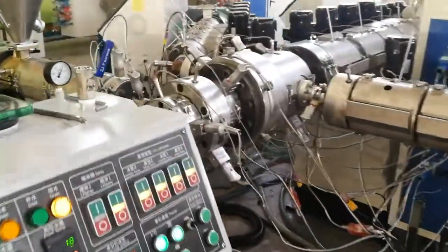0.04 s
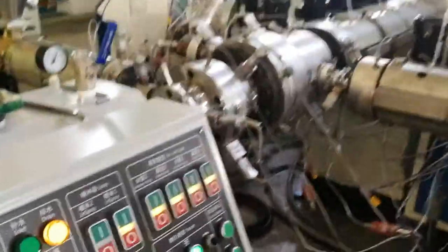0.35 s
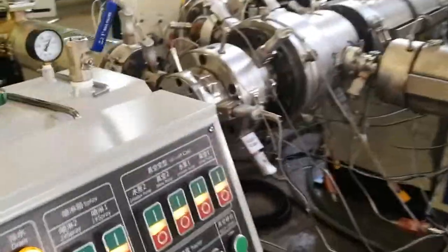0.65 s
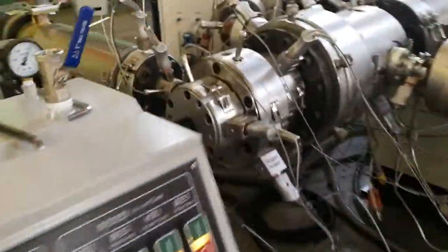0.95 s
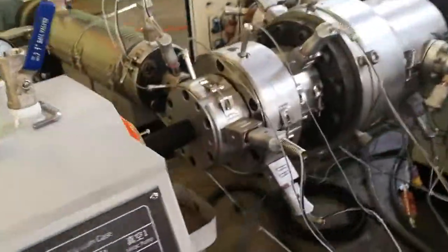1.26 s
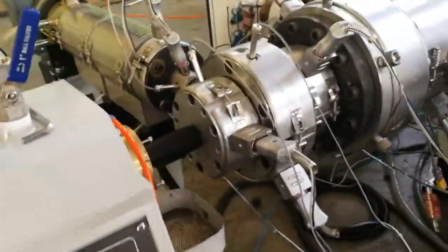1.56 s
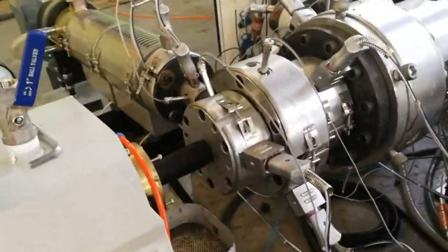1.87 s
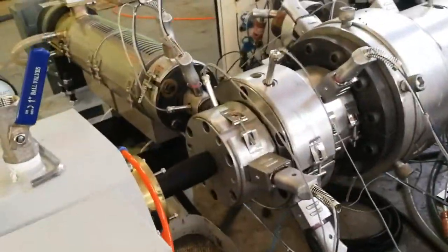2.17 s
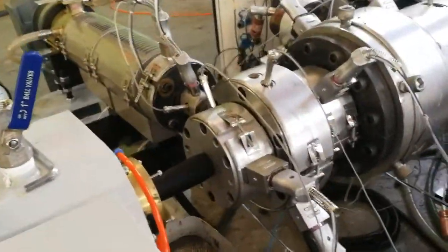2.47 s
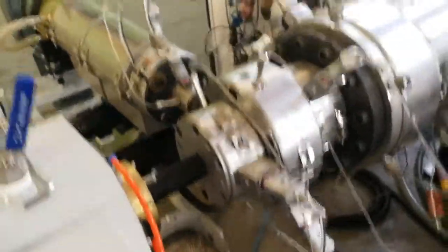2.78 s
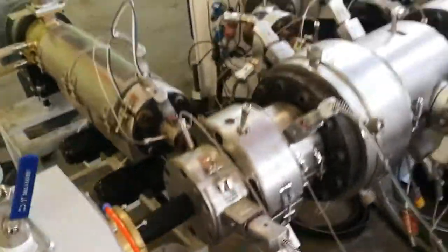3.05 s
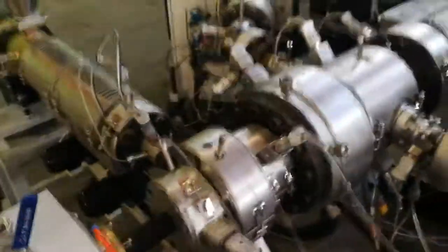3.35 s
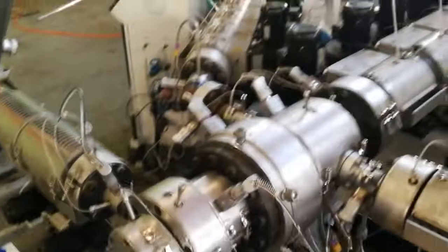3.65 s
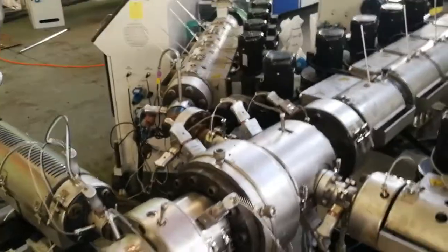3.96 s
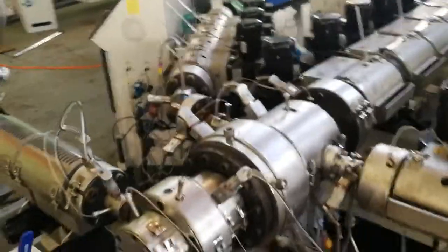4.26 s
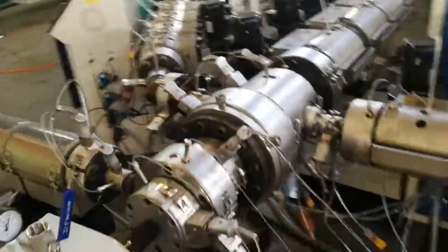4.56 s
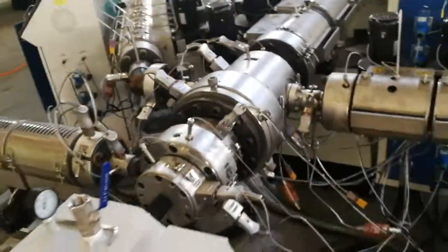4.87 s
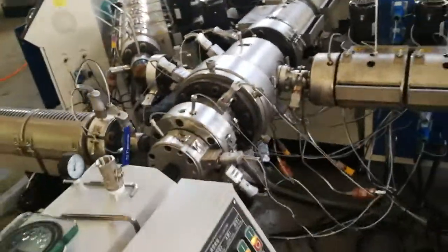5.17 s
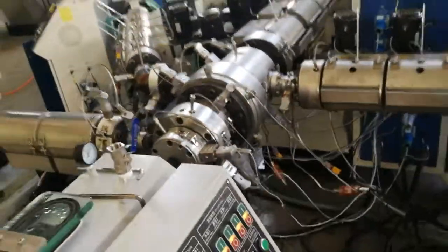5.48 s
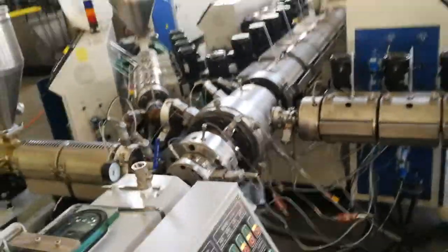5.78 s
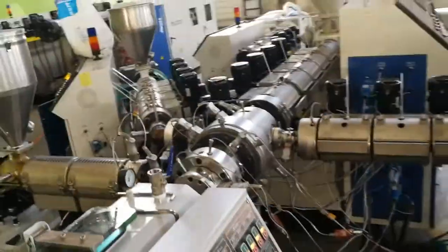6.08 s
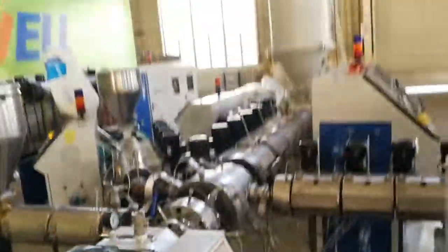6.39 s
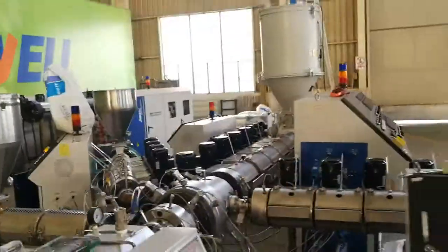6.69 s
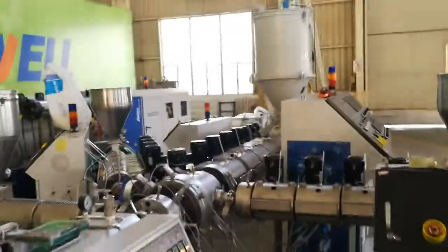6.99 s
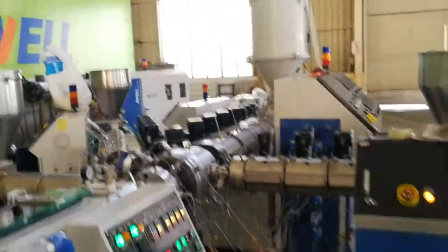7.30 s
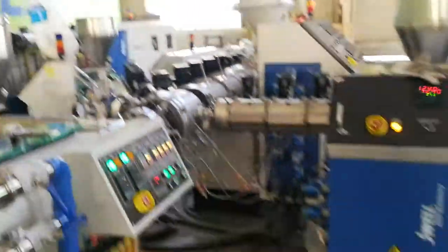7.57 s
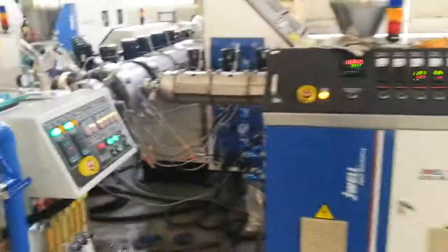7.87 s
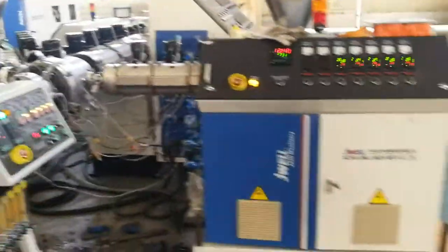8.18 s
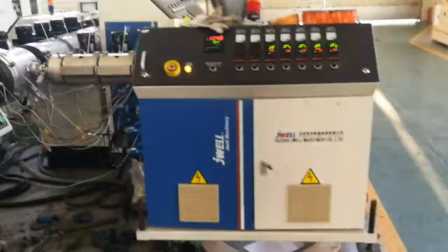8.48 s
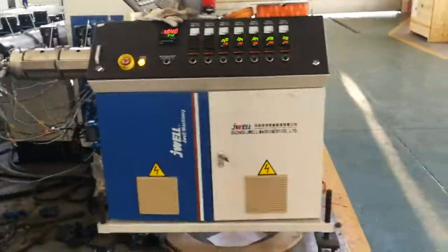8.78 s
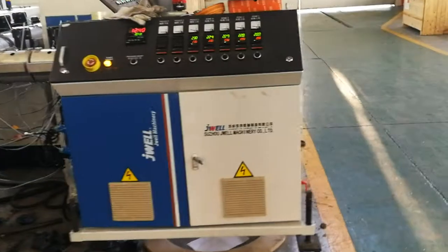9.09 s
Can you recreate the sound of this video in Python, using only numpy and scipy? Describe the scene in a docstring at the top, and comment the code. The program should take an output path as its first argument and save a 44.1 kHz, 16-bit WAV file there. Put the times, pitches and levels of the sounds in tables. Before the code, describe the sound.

From the start, a loud, bright hiss of air being sucked through a wet gap into a vacuum tank dominates, mostly stronger on the left, with a hollow, slightly whistling colour. Beneath it are the steady, diffuse roar of a large factory hall, a low motor hum and a faint gear whine. Two blowers at nearly the same middle pitch whine and beat quickly against each other, swelling and shifting between sides as the microphone moves along the extrusion line. The whine rises briefly just before 1 second. The hiss gives tiny sputters at about 2.2 seconds and more faintly near 4.7 seconds, and stays strong until around 6.5 seconds. The blower whine swells from about 6 seconds and peaks near 7. From 7 to 8 seconds the hiss recedes and the low rumble grows. The machinery keeps running, with a softer hiss, until the end at about 9 seconds.

```python
"""Pipe extrusion line in a factory hall

Air sucked through the wet gap round a plastic pipe at a vacuum tank's mouth makes a loud, sputtering
hiss: turbulent jet noise, coloured by the gap's resonances. Two blowers of almost equal pitch whine and
beat; motors and gearboxes hum in the hall's diffuse roar. The listener moves along the line."""
import sys
import numpy as np
from scipy import signal
from scipy.fft import rfft, irfft
from scipy.io import wavfile
from scipy.ndimage import uniform_filter1d

SR = 44100
rng = np.random.default_rng(int(sys.argv[2]) if len(sys.argv) > 2 else 0)


def output_pcm(signal):
    """Save a mono or channel-first signal as 16-bit PCM at the path in sys.argv[1].

    Samples are clipped to [-1, 1] before scaling.
    """
    pcm = np.clip(np.atleast_2d(signal).T, -1, 1) * 32767
    wavfile.write(sys.argv[1], SR, np.round(pcm).astype(np.int16))


N = 407484
TIME = np.arange(N) / SR
BAND_EDGE_HZ = 15850


def from_db(db):
    """Amplitude ratio of a level in decibels."""
    return 10 ** (np.asarray(db) / 20)


def unit_rms(x):
    """Normalisation to rms 1."""
    return x / np.sqrt(np.mean(x ** 2) + 1e-20)


def over_time(rows, t):
    """Linear interpolation of a table's columns at the times t."""
    time_s, *columns = np.transpose(rows)
    return [np.interp(t, time_s, column) for column in columns]


def over_frequency(rows, hz):
    """Interpolation of a table's columns on a logarithmic frequency axis."""
    row_hz, *columns = np.transpose(rows)
    return [np.interp(np.log(hz + 1), np.log(row_hz + 1), column) for column in columns]


def drift(t, rate_hz):
    """Low-pass noise: a random fluctuation of rms 1 that rolls off above rate_hz."""
    size, steps_per_s = 16384, 1000
    hz = np.fft.rfftfreq(size, 1 / steps_per_s)
    wander = irfft(rfft(rng.standard_normal(size)) / (1 + (hz / rate_hz) ** 4) ** .5)
    return np.interp(t, np.arange(size) / steps_per_s, unit_rms(wander))


def noise_pair(correlation, size):
    """Partial coherence: frequencies, times and short-time spectra of two correlated white noises."""
    white = rng.standard_normal((2, N))
    hz, t, (left, other) = signal.stft(white, SR, nperseg=size, noverlap=size - size // 4)
    hz = hz[:, None]
    shared = np.clip(over_frequency(correlation, hz)[0], -1, 1)
    return hz, t, left, shared * left + np.sqrt(1 - shared ** 2) * other


def to_sound(spectra, size):
    """Overlap-add synthesis from short-time spectra."""
    return signal.istft(np.array(spectra), nperseg=size, noverlap=size - size // 4)[1][:, :N]


def at_level(power, db):
    """Power response scaled so that unit white noise leaves it at the level db."""
    return power / power.mean(0) * from_db(db) ** 2


# Spectral density of the hall's roar: frequency_hz, relative_db
ROAR_SPECTRUM = [(15, -21), (35, -6), (65, -11), (110, -7.5), (160, -2), (210, -2), (350, -0.5), (470, -8),
                 (650, -2.5), (900, -1.5), (1500, 0), (2500, -5), (5000, -1.5), (16000, -17)]
# Hall sound along the path, each level taken about its mean: time_s, rumble_db, motor_db, fan_db
HALL_SWELL = [(0, -54, -41, -44), (1.1, -57, -42.5, -44.5), (1.6, -54, -41, -40.5),
              (3.45, -62.5, -43.5, -46.5), (4.1, -58, -41, -46), (5.1, -58.5, -44, -47.5),
              (7.2, -54.5, -38.5, -42), (8.5, -49.5, -40, -43.5), (9.24, -50, -40, -42)]
# Left-right coherence of the reverberant field: frequency_hz, correlation
HALL_COHERENCE = [(35, .999), (85, .99), (170, .97), (330, .74), (500, .3), (900, 0), (1500, -.1),
                  (3000, 0)]


def hall_roar(level_db=-32.0):
    """Diffuse field: reverberation blends fans and machines; long waves reach both sides alike."""
    hz, t, left, right = noise_pair(HALL_COHERENCE, size=2048)
    # frequency_hz, rumble_share, motor_share, fan_share
    bands = [(100, 1, 0, 0), (220, 0, 1, 0), (450, 0, 1, 0),
             (900, 0, 0, 1), (1700, 0, 0, 1), (5000, 0, 0, 0)]
    shares = over_frequency(bands, hz)
    swell_db = sum(share * (db - db.mean()) for share, db in zip(shares, over_time(HALL_SWELL, t)))
    power = at_level(from_db(over_frequency(ROAR_SPECTRUM, hz)[0]) ** 2, level_db)
    colour = np.sqrt(power) * from_db(swell_db)
    return to_sound([left * colour, right * colour], size=2048)


def hall_tone(cycles, hz, fade_hz=1.36, steady=0.85, waver=0.46):
    """Multipath interference: a tone of rms 1 shifts in strength and phase as the listener moves."""
    step = 32
    t = TIME[::step]
    left, other = [steady * np.exp(2j * np.pi * rng.random())
                   + (drift(t, fade_hz) + 1j * drift(t, fade_hz)) / 2 for _ in "LR"]
    shared = np.clip(over_frequency(HALL_COHERENCE, hz)[0], -1, 1)
    paths = np.array([left, shared * left + np.sqrt(1 - shared ** 2) * other])
    paths *= 1 + waver * drift(t, 8.0)  # an uneven load shakes the tone
    paths /= np.sqrt(np.mean(abs(paths) ** 2, axis=1, keepdims=True) / 2)
    return (np.repeat(paths, step, axis=1)[:, :N] * np.exp(2j * np.pi * cycles)).real


# Tones of motors, pumps and gears, before the swell along the path: pitch_hz, level_db
HUM_TONES = [(36.3, -70), (99.6, -61), (185.7, -59), (193.8, -55), (203.2, -59), (240, -55), (242.7, -52),
             (286.7, -58), (292, -56), (300.1, -56), (352.6, -54), (363.4, -54), (371.4, -57), (418.6, -62),
             (438.7, -52.5), (442.8, -58), (773.8, -54), (877.5, -57), (885.6, -57), (1191.1, -52),
             (1200.5, -51), (1242.2, -59)]


def motor_hum():
    """Line spectrum of rotating machines, louder as the listener nears the drives."""
    motor_db = over_time(HALL_SWELL, TIME)[1]
    hum = sum(from_db(db) * hall_tone(hz * TIME, hz) for hz, db in HUM_TONES)
    return hum * from_db(motor_db - motor_db.mean())


# Gear whine along the path: time_s, level_db
GEAR_LEVEL = [(0, -49), (1.2, -51), (2.9, -44.5), (3.3, -49), (4.3, -44.5), (4.6, -57), (6.1, -56),
              (7.7, -43), (8.4, -54), (9.24, -43)]


def gear_whine(mesh_hz=1075.3, left_lead_cycles=0.044, waver=0.28):
    """Gear-mesh tone: direct sound from the gearbox, modulated in phase and amplitude by the load."""
    cycles = mesh_hz * TIME + np.array([[left_lead_cycles], [0]]) + 0.11 * drift(TIME, 2.2)
    tone = np.sqrt(2) * from_db(over_time(GEAR_LEVEL, TIME)[0]) * np.sin(2 * np.pi * cycles)
    return tone * (1 + waver * drift(TIME, 8.8))


def blade_passes(pitch_hz, wander_hz):
    """Phase as the integral of frequency: the count of blades passed at a slightly wandering speed."""
    return np.cumsum(pitch_hz + wander_hz * drift(TIME, 1.1)) / SR


def blade_whine(passes, levels, leads, roughness, eddy_hz=28):
    """Blade-pass tone, randomly modulated by turbulence at the intake."""
    lead_cycles = over_time(leads, TIME)[0]
    tone = np.exp(2j * np.pi * (passes + np.array([lead_cycles, -lead_cycles]) / 2))
    eddies = np.array([drift(TIME, eddy_hz) + 1j * drift(TIME, eddy_hz) for _ in "LR"])
    return np.sqrt(2) * from_db(over_time(levels, TIME)) * (tone * (1 + roughness * eddies)).real


# Each whine along the path through the hall's standing waves: time_s, left_db, right_db
NEAR_WHINE_LEVEL = [(0.0, -35.5, -41.5), (0.71, -24.5, -25), (0.87, -22, -42), (1.23, -39.5, -30.5),
                    (2.39, -36.5, -30), (2.85, -29, -42), (3.16, -51, -34.5), (4.12, -36, -29.0),
                    (4.48, -55, -38), (4.74, -30.5, -49), (5.0, -31.5, -29), (5.76, -23, -44),
                    (5.97, -30, -27.5), (6.58, -24, -38.0), (7.09, -20, -28.5), (8.15, -35, -42),
                    (8.56, -24.5, -42), (9.24, -48, -35.0)]
FAR_WHINE_LEVEL = [(0.0, -36.0, -33), (4.31, -40, -55), (4.97, -45.5, -57), (6.78, -28.5, -31.5),
                   (8.19, -36, -36), (9.24, -31, -52)]
# Phase lead of each whine on the left: time_s, lead_cycles
NEAR_PHASE_LEAD = [(0, .55), (.7, .1), (1, .5), (1.7, .35), (2.4, .85), (3.7, 1.15), (4.8, .9), (5.9, 1.75),
                   (7.7, 1.45), (8.2, 1.85), (8.7, 1.65), (9.24, 2.6)]
FAR_PHASE_LEAD = [(0, .45), (3.5, .05), (5, -.55), (5.8, -.5), (6.4, .35), (7.8, .6), (9.24, .15)]
# Shaft harmonics from the near blower's uneven blades: shaft_order, relative_db
SHAFT_HARMONICS = [(7, -53), (10, -60), (11, -61), (12, -63), (13, -58), (14, -55), (16, -53), (20, -62),
                   (30, -54)]


def blowers(near_hz=716.8, far_hz=725.2, blade_count=15, harmonics_db=0.5):
    """Beating: two blade-pass tones interfere at their difference frequency, about 8 Hz."""
    near = blade_passes(near_hz, wander_hz=0.3)
    far = blade_passes(far_hz, wander_hz=0.53)
    sound = blade_whine(near, NEAR_WHINE_LEVEL, NEAR_PHASE_LEAD, roughness=0.11)
    sound += blade_whine(far, FAR_WHINE_LEVEL, FAR_PHASE_LEAD, roughness=0.21)
    for order, db in SHAFT_HARMONICS:
        ratio = order / blade_count
        sound += from_db(db + harmonics_db) * hall_tone(ratio * near, ratio * near_hz)
    return sound


def steel_comb(hz, t, reflection=0.12, count=8):
    """Comb filtering: echoes off the steel round the gap ripple the gain as the listener moves."""
    gain = 1
    for delay_s in rng.uniform(.0008, .0035, count):
        moving_delay_s = delay_s * (1 + 0.043 * drift(t, 0.44))
        gain += reflection * np.cos(2 * np.pi * (hz * moving_delay_s + rng.random()))
    return gain


def machine_echoes(x, wet_db=-8, t60_s=0.083, size=32768):
    """Early reflections off the machines add a fine grain that changes with the listener's position."""
    t = np.arange(4096) / SR
    hop = size // 2
    wet = np.zeros((2, N + 2 * size))
    padded = np.pad(x, ((0, 0), (hop, size)))
    for start in range(0, N + hop, hop):
        tail = rng.standard_normal(len(t)) * from_db(-60 * t / t60_s)
        part = padded[:, start:start + size]
        part = part * signal.windows.cosine(size)[:part.shape[1]]
        echo = signal.fftconvolve(part, tail[None] / np.linalg.norm(tail), axes=1)
        wet[:, start:start + echo.shape[1]] += echo
    return (x + from_db(wet_db) * wet[:, hop:hop + N]) / np.hypot(1, from_db(wet_db))


# Spectral density of the jet: frequency_hz, left_relative_db, right_relative_db
JET_SPECTRUM = [(800.0, -53, -8), (1800.0, -26, -26), (4220, 0, 3.5), (5370, -3.5, -21), (6270, -6, 0),
                (9090, -4, -1.5), (8950, 3, 10), (10950, -1.5, -5.5), (11430, 6, 9), (13050, -2, -6.5),
                (13400, 5, -1), (15200, -0.3, 6.5), (15600, 7, 4)]
# The jet as the tank's mouth nears and recedes, before the treble gain: time_s, left_db, right_db
JET_PATH_LEVEL = [(0.0, -19, -23), (0.16, -17.5, -23), (0.87, -20, -26.0), (1.83, -15.5, -27.5),
                  (2.69, -17.5, -28), (3.3, -16.5, -23.5), (4.61, -15, -19.5), (5.32, -17.5, -19),
                  (5.48, -16.5, -21), (6.99, -22.5, -30), (8.1, -30, -34.5), (9.24, -28, -34)]
# The jet's top octave against the rest: time_s, gain_db
JET_TREBLE = [(0.0, -6), (1.06, -2.5), (2.57, -2), (3.18, 2.5), (5.49, -6.5), (6.65, -5), (7.26, -4),
              (7.72, -2.5), (9.24, -6)]


def jet_power(side, hz, t):
    """Turbulent jet noise: a broad power spectrum with beamed treble, on one side (0 left, 1 right)."""
    spectrum = from_db(over_frequency(JET_SPECTRUM, hz)[side]) ** 2 * (hz < BAND_EDGE_HZ)
    beamed_share = over_frequency([(9000, 0), (14000, 1)], hz)[0]
    treble_gain = from_db(beamed_share * over_time(JET_TREBLE, t)[0])
    return at_level(spectrum, over_time(JET_PATH_LEVEL, t)[side]) * treble_gain ** 2


def resonance(hz, centre_hz, width_hz, level_db):
    """Power response of a steep-sided resonance, width_hz wide at 6 dB below its peak."""
    return at_level(1 / (1 + (2 * (hz - centre_hz) / width_hz) ** 2) ** 2, level_db)


# The gap's three resonances are beamed, so each side has its own level: time_s, left_db, right_db
GAP_HOLLOW_LEVEL = [(0.0, -24, -31), (0.81, -21.5, -29), (1.37, -22.0, -25), (2.73, -25, -27),
                    (4.44, -24, -25.5), (5.25, -23.0, -46), (6.51, -25, -27.5), (7.12, -25.5, -31.5),
                    (9.24, -30, -37)]
GAP_RING_LEVEL = [(0.0, -31, -41), (0.91, -38.0, -37), (1.17, -26.0, -40.0), (2.58, -17.5, -34),
                  (2.94, -24, -28.5), (4.85, -29.5, -37.5), (5.06, -33, -25), (5.92, -29, -25.5),
                  (6.63, -32, -26), (7.99, -27.5, -36.5), (9.24, -30.5, -34)]
GAP_WHISTLE_LEVEL = [(0.0, -20.5, -24.5), (0.91, -16, -28), (1.22, -23.0, -25.5), (1.88, -27.0, -24.5),
                     (2.79, -19.5, -30.5), (3.1, -24, -18.5), (3.71, -21.5, -24.5), (4.12, -23, -18),
                     (5.03, -14.5, -21.5), (5.44, -17.5, -27), (6.0, -22.0, -17), (6.46, -19, -16.5),
                     (8.37, -27, -35.5), (9.24, -27, -31)]
# Centre of the lowest, hollow resonance: time_s, left_hz, right_hz
HOLLOW_CENTRE = [(0.0, 2930, 3340), (1.21, 2910, 3200), (4.02, 2670, 3650), (4.42, 2820, 2950),
                 (5.22, 2960, 3610), (6.03, 3150, 3510), (7.23, 2970, 3930), (8.03, 3080, 3200),
                 (9.24, 3030, 3470)]
# Water in the gap slowly retunes the upper two: time_s, ring_hz, whistle_hz
UPPER_CENTRES = [(0.0, 5040, 7350), (3.21, 4680, 7300), (3.62, 5100, 7280), (4.02, 4850, 7250),
                 (5.62, 4680, 7340), (6.03, 4840, 7240), (6.83, 4550, 7400), (8.03, 4860, 7280),
                 (9.24, 4700, 7330)]


def gap_power(side, hz, t, ring_flutter_db, whistle_flutter_db):
    """Flow-excited resonance: the power spectrum of three modes of the gap, heard on one side."""
    hollow_db = over_time(GAP_HOLLOW_LEVEL, t)[side]
    ring_db = over_time(GAP_RING_LEVEL, t)[side] + ring_flutter_db
    whistle_db = over_time(GAP_WHISTLE_LEVEL, t)[side] + whistle_flutter_db
    hollow_hz = over_time(HOLLOW_CENTRE, t)[side]
    ring_hz, whistle_hz = over_time(UPPER_CENTRES, t)
    return (resonance(hz, hollow_hz, width_hz=(1080, 1130)[side], level_db=hollow_db)
            + resonance(hz, ring_hz, width_hz=620, level_db=ring_db)
            + resonance(hz, whistle_hz, width_hz=640, level_db=whistle_db))


# Gulps of air that break through the water seal: start_s, lift_db
SEAL_GULPS = [(2.149, 4), (2.199, 6), (2.483, 1), (4.664, 2)]


def sputter(decay_s=0.0051):
    """Amplitude modulation: water chokes the gap, and each gulp of air briefly lifts the gain."""
    kicks = np.zeros(N)
    for start_s, db in SEAL_GULPS:
        kicks[round(start_s * SR)] = db
    lift_db = signal.lfilter([1], [1, -np.exp(-1 / (decay_s * SR))], kicks)
    return unit_rms(from_db(lift_db))


# Left-right coherence of the hiss: frequency_hz, correlation
HISS_COHERENCE = [(1500, 0), (3000, 0.9), (5000, 0.6), (7300, 0.93), (10000, 0.6), (15000, 0.56)]
# Later arrival of the hiss on the right as the listener turns: time_s, delay_ms
RIGHT_DELAY = [(0, .207), (.8, .185), (1.5, .249), (2.9, .286), (4.2, .248), (5.75, .132), (7.2, .135),
               (8.5, .323), (9.24, .34)]


def suction_hiss(flutter_db=0.83, eddy_db=0.8, low_edge_hz=900):
    """Source and filter: air rushing into the vacuum tank makes noise that the gap and steel colour."""
    hz, t, left, right = noise_pair(HISS_COHERENCE, size=512)
    flutters_db = [-flutter_db * drift(t, 29) for _ in ("ring", "whistle")]
    # eddies lift patches about 2 kHz wide and 30 ms long
    eddies = uniform_filter1d(rng.standard_normal(left.shape), size=24, axis=0)
    eddies = unit_rms(uniform_filter1d(eddies, size=10, axis=1))
    high_pass = hz ** 2 / np.sqrt(hz ** 4 + low_edge_hz ** 4)  # so small a jet makes no bass
    source_gain = from_db(eddy_db * eddies) * high_pass
    spectra = []
    for side, noise in enumerate((left, right)):
        power = jet_power(side, hz, t) + gap_power(side, hz, t, *flutters_db)
        spectra.append(noise * source_gain * np.sqrt(power) * steel_comb(hz, t))
    delay_s = over_time(RIGHT_DELAY, t)[0] / 1000
    spectra[1] *= np.exp(-2j * np.pi * hz * delay_s)
    return to_sound(spectra, size=512) * sputter()


def scene():
    """Superposition of the hall, the drives, the blowers and the hiss with its echoes."""
    return hall_roar() + motor_hum() + gear_whine() + blowers() + machine_echoes(suction_hiss())


def record(dry):
    """Band limiting by a linear-phase low-pass filter."""
    low_pass = signal.firwin(401, BAND_EDGE_HZ, window=("kaiser", 8), fs=SR)
    return signal.oaconvolve(dry, low_pass[None], "same")


dry = scene()
out = record(dry)
output_pcm(out)
```